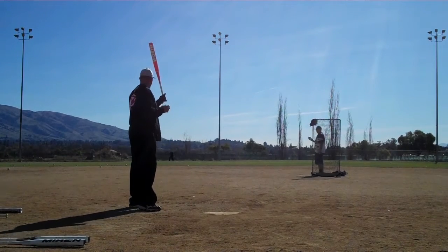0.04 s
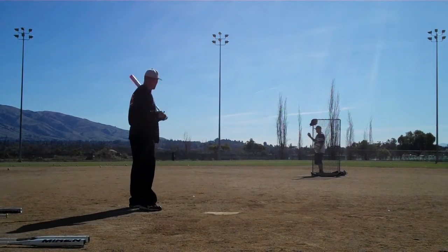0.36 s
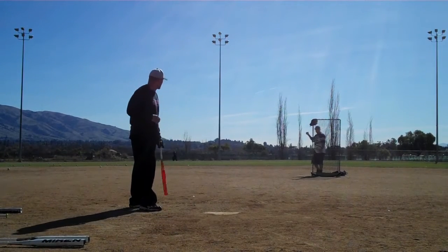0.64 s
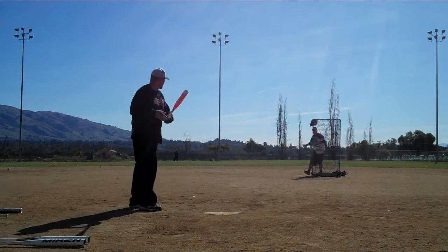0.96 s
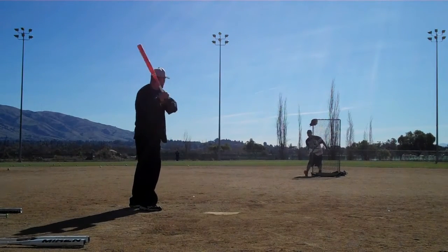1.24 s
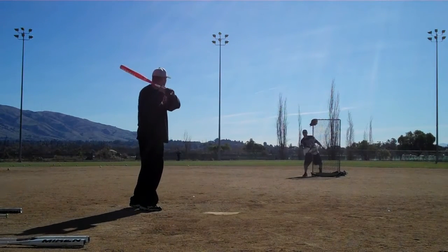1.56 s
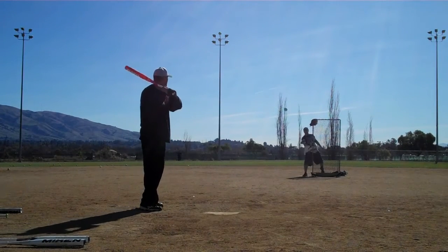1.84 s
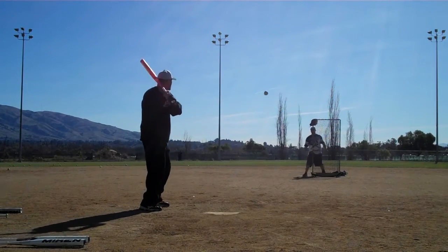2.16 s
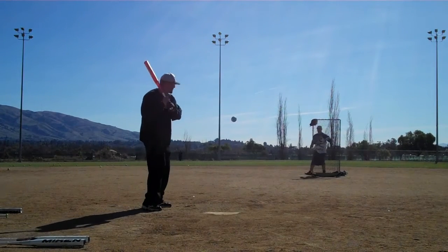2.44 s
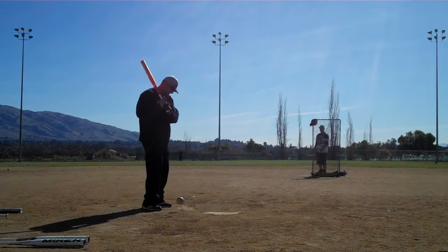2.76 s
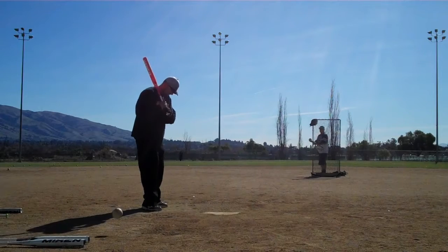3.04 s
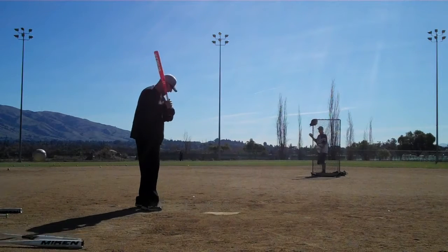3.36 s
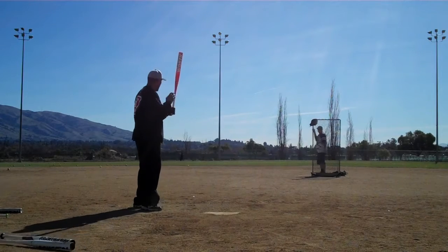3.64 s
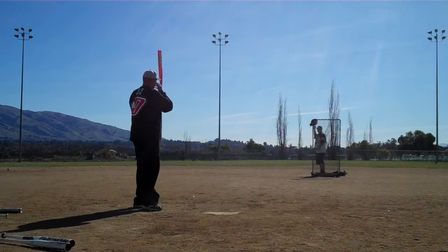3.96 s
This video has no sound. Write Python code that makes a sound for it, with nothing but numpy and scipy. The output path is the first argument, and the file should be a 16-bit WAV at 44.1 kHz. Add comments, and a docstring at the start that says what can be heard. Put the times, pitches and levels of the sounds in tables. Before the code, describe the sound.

A softball knocks into metal bats on an open field with distant traffic humming throughout. Faint shoe scuffs and a far knock come around 2.2 to 2.5 seconds. The ball thuds on dirt at 2.8 seconds, bounces more softly just before 3.2, then strikes the nearby bats at 3.2 and 3.3. They ring with a throbbing tone, clack together in the grit and settle by about 3.6 as the ringing fades.

```python
"""A softball runs into metal bats

A pitched softball thuds on the dirt of an open field, hops once more and hits three bats lying close by.
Two blows set the bats ringing, and their close pitches beat against each other. The barrels clack
together, grind in the grit and settle. A nearby surface returns quick echoes, and shoes scuff faintly
over the wash and hum of distant traffic."""
import sys
import numpy as np
from scipy import signal
from scipy.fft import rfft, irfft
from scipy.io import wavfile

SR = 44100
rng = np.random.default_rng(int(sys.argv[2]) if len(sys.argv) > 2 else 0)


def wrap_up_sound(samples):
    """Save the sound to the file named by the first command line argument, as 16-bit audio."""
    columns = np.atleast_2d(samples).T
    # keep every value between -1 and 1, then stretch to whole-number steps
    tamed = np.clip(columns, -1, 1)
    steps = np.round(tamed * 32767).astype(np.int16)
    wavfile.write(sys.argv[1], SR, steps)


N = 176400
TIME = np.arange(N) / SR
FREQS = np.maximum(np.arange(N // 2 + 1) * SR / N, 1e-3)


def from_db(db):
    """Turn decibels into a number to multiply by."""
    return 10 ** (np.asarray(db) / 20)


def rms_one(x):
    """Scale a signal to an average power of 1."""
    return x / np.sqrt(np.mean(x ** 2) + 1e-20)


def at_hz(points):
    """Join (pitch_hz, value) points into a curve over all frequencies."""
    hz, value = np.transpose(points)
    return np.interp(np.log(FREQS), np.log(hz), value)


def colour(x, tone):
    """Shape a sound with a tone table; only the differences between its levels count."""
    cepstrum = irfft(np.log(rms_one(from_db(at_hz(tone)))), N)
    # this folding keeps the filter from sounding before a hit
    cepstrum[1:N // 2] *= 2
    cepstrum[N // 2 + 1:] = 0
    return irfft(rfft(x) * np.exp(rfft(cepstrum)), N)


def keep_band(x, side, hz, order):
    """Keep the "low" or "high" side of a frequency; a higher order cuts more steeply."""
    return signal.sosfilt(signal.butter(order, hz, side, fs=SR, output="sos"), x)


def swell(peak_s, rise_s, decay_s):
    """A loudness curve that rises to 1 and dies away."""
    distance = np.maximum((peak_s - TIME) / rise_s, (TIME - peak_s) / decay_s)
    return np.exp(-np.minimum(distance, 40))


def clicks(rows):
    """One click for each (start_s, level_db)."""
    return irfft(sum(from_db(db) * np.exp(-2j * np.pi * FREQS * s) for s, db in rows), N)


def ring(hz, ring_s, build_cycles=.7):
    """A pure tone that builds up quickly and fades by 60 dB in ring_s."""
    t = TIME[:SR]
    fade = np.exp(-np.log(1000) * t / ring_s)
    build = 1 - np.exp(-(hz * t / build_cycles) ** 2)
    return np.sin(2 * np.pi * hz * t) * fade * build


def convolve(x, response):
    """Pass a sound through something, given how that thing answers one click."""
    return signal.fftconvolve(x, response)[:N]


def delay(x, s):
    """Make a sound arrive a moment later."""
    return irfft(rfft(x) * np.exp(-2j * np.pi * FREQS * s), N)


# Quick echoes of sounds out on the dirt: delay_s, level_db
DIRT_ECHOES = [(.0053, 2.5), (.0083, -9), (0.0168, -8.5)]
# The quick echo of sounds at the bats: delay_s, level_db
BAT_ECHOES = [(.00505, -6)]

def open_field(x, echoes, pan_db, left_leads_s, scatter_db, echo_cut_hz=1840, tail_s=.11):
    """Place a sound in stereo with dull echoes and a faint tail scattered by ground and fences."""
    # filtering forwards and backwards dulls the echoes without making them later
    dull = signal.sosfiltfilt(signal.butter(1, echo_cut_hz, fs=SR, output="sos"), x)
    near = x + sum(from_db(db) * delay(dull, s) for s, db in echoes)
    left = near * from_db(pan_db / 2)
    right = delay(near, left_leads_s) * from_db(-pan_db / 2)
    scatter = rng.standard_normal((2, SR)) * np.exp(-np.log(1000) * TIME[:SR] / tail_s)
    scatter = keep_band(scatter, "low", hz=7100, order=1)
    tail = np.array([convolve(x, side / np.linalg.norm(side)) for side in scatter])
    return np.array([left, right]) + from_db(scatter_db) * tail


# The tone of far traffic: pitch_hz, relative_db
TRAFFIC_TONE = [(13, -30), (22, -3), (92, -1.5), (114, -8.5), (213, -15), (302, -12), (466, -14),
                (505, -13.5), (548, -17.5), (717, -15), (844, -20), (992, -18.5), (1750, -26.5),
                (1950, -25), (4750, -31), (10700, -46), (14000, -57.5)]
# How alike it is in the two ears: pitch_hz, likeness (0 = unrelated, 1 = the same)
TRAFFIC_LIKENESS = [(25, 0.43), (70, 1), (280, 0.94), (620, 0.94), (1340, 0.72), (2900, 0.45), (6000, .05),
                    (13000, .02)]

def traffic(wash_db=-55.5, top_hz=12400, pan_db=-1.0, hum_db=-61.5, hum_hz=88.6, hum_width_hz=7):
    """Far traffic blends into a steady wash, wide in the treble, with a wavering low hum."""
    shared, apart, drone = rfft(rng.standard_normal((3, N)))
    alike = at_hz(TRAFFIC_LIKENESS)
    stereo_noise = np.sqrt(1 + alike) * shared + np.sqrt(1 - alike) * apart * [[1], [-1]]
    wash = stereo_noise * from_db(at_hz(TRAFFIC_TONE)) * (FREQS < top_hz)
    left, right = from_db(wash_db) * rms_one(irfft(wash, N))
    narrow_band = drone / (1 + ((FREQS - hum_hz) / hum_width_hz) ** 2)
    hum = from_db(hum_db) * rms_one(irfft(narrow_band, N))
    return np.array([delay(left, s=.0001) * from_db(pan_db / 2), right * from_db(-pan_db / 2)]) + hum


# Shoes shifting on the dirt: peak_s, level_db, rise_s, decay_s
SCUFFS = [(2.242, -55.5, 0.011, 0.021), (2.369, -55, 0.0007, 0.0019), (2.427, -52, 0.00071, 0.0013),
          (2.4677, -46.5, 0.0009, 0.0024)]
# The tone of a scuff: pitch_hz, relative_db
SCUFF_TONE = [(300, 4.5), (1300, 8.5), (3000, -2.5), (6000, -5), (9000, -30), (14000, -32)]
# Faint knocks far away: peak_s, level_db
FAR_KNOCKS = [(1.7005, -56), (2.265, -44)]
# The tone of a far knock: pitch_hz, relative_db
FAR_KNOCK_TONE = [(300, -12), (800, 0.5), (1400, 9), (2200, -11), (5000, -42)]

def players():
    """Shoes rub the dirt in tiny puffs of noise, and two knocks come from far off."""
    scuff_shape = sum(from_db(db) * swell(s, rise, decay) for s, db, rise, decay in SCUFFS)
    knock_shape = sum(from_db(db) * swell(s, rise_s=.00064, decay_s=.0039) for s, db in FAR_KNOCKS)
    scuffs = colour(scuff_shape * rng.standard_normal(N), SCUFF_TONE)
    knocks = colour(knock_shape * rng.standard_normal(N), FAR_KNOCK_TONE)
    return keep_band(scuffs + knocks, "low", hz=8500, order=4)


# The ball landing on dirt: start_s, thud_db, grit_db
BOUNCES = [(2.7554, -8.5, -40), (3.1778, -18, -49)]
# The tone of the thud: pitch_hz, relative_db
THUD_TONE = [(90, -43.5), (200, -6), (370, -2), (620, 0), (1000, -11), (2000, -17), (4000, -25.5),
             (8000, -48.5), (14000, -66.5)]
# The tone of the grit: pitch_hz, relative_db
GRIT_TONE = [(200, -34), (1000, 8.5), (2500, -15.5), (4000, -4.5), (6500, -4), (9000, -16.5),
             (14000, -23.5)]

def ball_on_dirt(grit_leads_s=.00013, spray_db=-13):
    """Each landing makes a hollow thud, crunches the grit and throws a short spray of sand."""
    thuds = colour(clicks([(s, db) for s, db, _ in BOUNCES]), THUD_TONE)
    grit_shape = 0
    for start_s, _, grit_db in BOUNCES:
        crunch = swell(start_s - grit_leads_s, rise_s=.00039, decay_s=.00046)
        spray = from_db(spray_db) * swell(start_s, rise_s=.0004, decay_s=.014)
        grit_shape += from_db(grit_db) * (crunch + spray)
    return thuds + colour(grit_shape * rng.standard_normal(N), GRIT_TONE)


# Barrels (the bats' thick ends) hitting each other and the grit:
# peak_s, level_db, treble_db, rise_s, decay_s, ping_hz
CLACKS = [(3.201, -26, -5.5, 0.00075, 0.0017, 3960), (3.2283, -37, -5.5, 0.0022, 0.0034, 4560),
          (3.3193, -36.5, -9.5, .0004, 0.0042, 3960), (3.3490, -38.5, 8, .003, 0.001, 3480),
          (3.4062, -44.5, -5.5, .0005, 0.0052, 4120), (3.4101, -38, -6.5, .0005, 0.0016, 5518),
          (3.42, -56.5, -0.5, .006, 0.016, 5518), (3.499, -39, 3, .0005, 0.0004, 5518),
          (3.545, -60.5, 0.5, 0.0032, 0.032, 4120), (3.605, -48, -17, 0.00061, 0.007, 3480)]
# The high notes of the barrel walls: pitch_hz, relative_db
WALL_NOTES = [(2980, -19.5), (3250, 0.5), (3480, -2), (3960, -23), (4120, -3), (4560, -35.5), (4850, -12),
              (5150, -7), (5518, 0.5), (6300, -14), (6900, 10.5), (7350, 1), (8030, 2), (8680, -12),
              (9300, -3.5), (10600, 4), (12000, 3), (12800, 2)]
# The overall tone of a clack: pitch_hz, relative_db
CLACK_TONE = [(300, -4), (1200, -1), (2400, -9), (3600, -1.5), (5500, -9.5), (8000, -12), (11000, -15),
              (14000, -21)]

def barrels_clacking(wall_db=-40.5, spread_db=3.5, ping_db=12.5, ping_width_hz=230):
    """Each contact is a gritty burst that rings the walls in its own mix, boosted near one pitch."""
    grit = rng.standard_normal(N)
    treble = irfft(rfft(grit) * at_hz([(3500, 0), (7500, 1)]), N)
    walls = np.array([from_db(db + wall_db) * ring(hz, ring_s=.03) for hz, db in WALL_NOTES])
    wall_hz = np.array(WALL_NOTES)[:, 0]
    clacks = 0
    for peak_s, level_db, treble_db, rise_s, decay_s, ping_hz in CLACKS:
        noise = grit + (from_db(treble_db) - 1) * treble
        force = noise * from_db(level_db) * swell(peak_s, rise_s, decay_s)
        mix_db = spread_db * rng.uniform(-1, 1, len(walls))
        boost_db = ping_db * np.exp(-((wall_hz - ping_hz) / ping_width_hz) ** 2)
        clacks += force + convolve(force, from_db(mix_db + boost_db) @ walls)
    return colour(clacks, CLACK_TONE)


# The tone of the ball's own knock: pitch_hz, relative_db
BALL_KNOCK_TONE = [(120, -21), (230, -18), (420, 2), (680, 5.5), (1100, -3), (1500, 4), (2100, -11),
                   (3200, -16), (6000, -34.5), (14000, -42)]

def ball_on_bats(blows, level_db=-4.5, squash_s=.00049):
    """The ball gives a dry knock just after it touches a bat; it is too small to send out deep bass."""
    pushes = clicks([(start_s + squash_s, level_db) for start_s, *_ in blows])
    return keep_band(colour(pushes, BALL_KNOCK_TONE), "high", hz=190, order=3)


# The ball's blows and how hard each bat feels them: start_s, first_bat_db, second_bat_db, third_bat_db
BLOWS = [(3.20077, 0, -.1, -17.6), (3.31776, -2.5, 0, 0)]
# The notes each bat makes as it bends to and fro: pitch_hz, level_db, ring_s
FIRST_BAT_NOTES = [(230.8, -37.6, .95), (443, -36, .06), (630, -31, .04), (774.5, -18.8, .09),
                   (792, -12.2, .24), (1220, -46, .16), (2034, -40, .05), (2303.8, -40.5, .2)]
SECOND_BAT_NOTES = [(807.7, -21.2, .73), (1463.4, -38.5, .52), (2968, -62, .45)]
THIRD_BAT_NOTES = [(235, -47.2, 1.25), (824.4, -18.2, .38), (830, -48, 2.1), (1427, -41.5, .42),
                   (2382.2, -38, .16), (3303, -60, .2)]

def bats_ringing(settle_start_s=3.49, settle_takes_s=.06, settle_loss_db=1.4):
    """Each blow rings all three bats; notes close in pitch beat, which makes the sound throb."""
    # the first bat swings the opposite way to its neighbours
    bats = [(FIRST_BAT_NOTES, -1), (SECOND_BAT_NOTES, 1), (THIRD_BAT_NOTES, 1)]
    ringing = 0
    for bat, (notes, direction) in enumerate(bats):
        pushes = clicks([(start_s, levels_db[bat]) for start_s, *levels_db in BLOWS])
        chord = sum(from_db(db) * ring(hz, ring_s) for hz, db, ring_s in notes)
        ringing += direction * convolve(pushes, chord)
    # the dirt quiets the bats a little as they come to rest
    settled = np.clip((TIME - settle_start_s) / settle_takes_s, 0, 1)
    return ringing * from_db(-settle_loss_db * settled)


def scene():
    """The bats close by, the bounces and players farther out, traffic behind."""
    rings = open_field(bats_ringing(), BAT_ECHOES, pan_db=-.9, left_leads_s=.00004, scatter_db=-16)
    hits = ball_on_bats(BLOWS) + barrels_clacking()
    hits = open_field(hits, BAT_ECHOES, pan_db=-2.0, left_leads_s=.00004, scatter_db=-9.5)
    infield = ball_on_dirt() + players()
    infield = open_field(infield, DIRT_ECHOES, pan_db=-1.9, left_leads_s=.00001, scatter_db=-9.5)
    return rings + hits + infield + traffic()


def record(dry):
    """Cut the very highest treble, by at least 60 dB from 15000 Hz up."""
    return signal.sosfilt(signal.cheby2(14, 60, 15000, fs=SR, output="sos"), dry)


dry = scene()
out = record(dry)
wrap_up_sound(out)
```